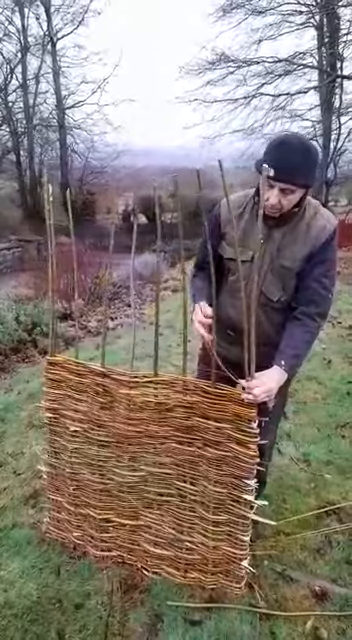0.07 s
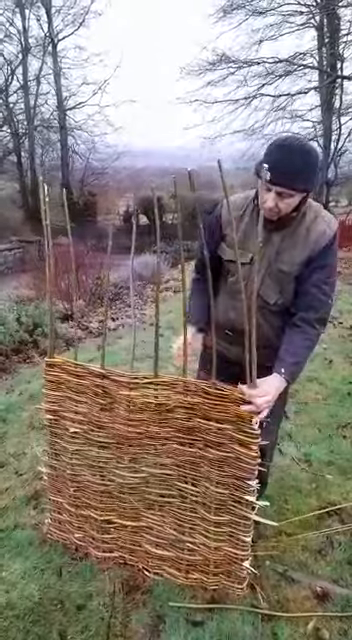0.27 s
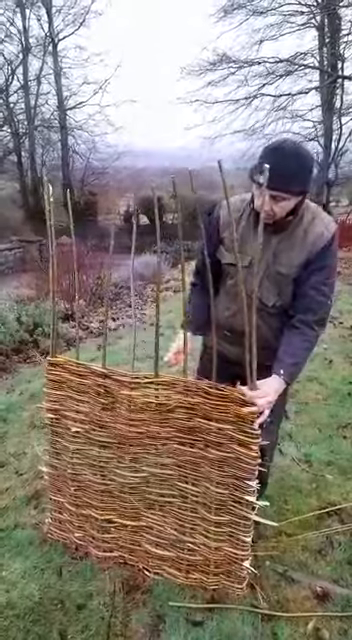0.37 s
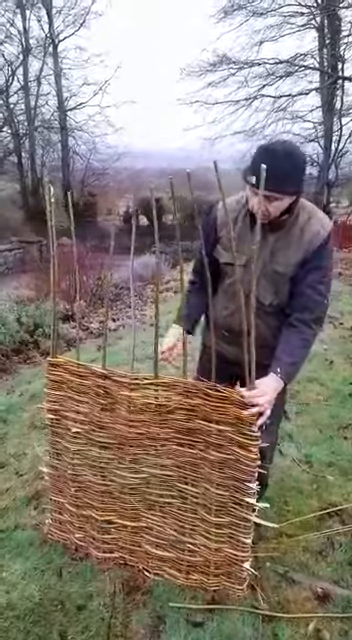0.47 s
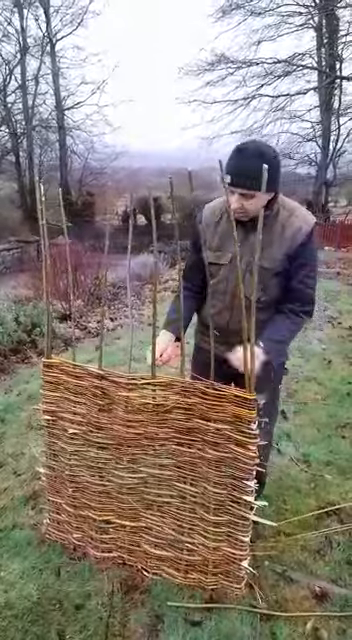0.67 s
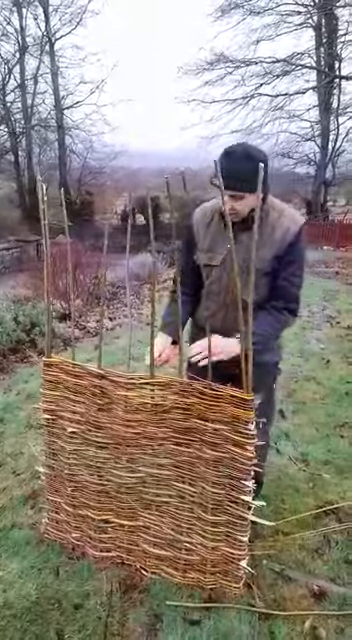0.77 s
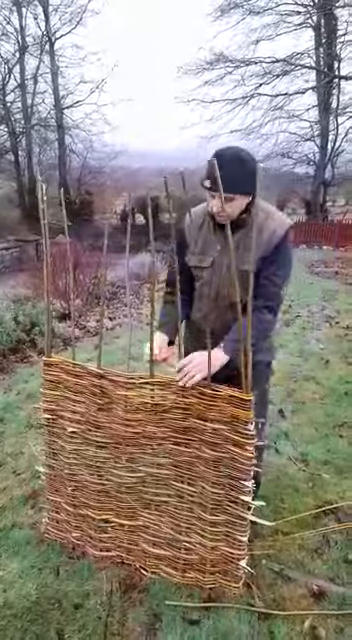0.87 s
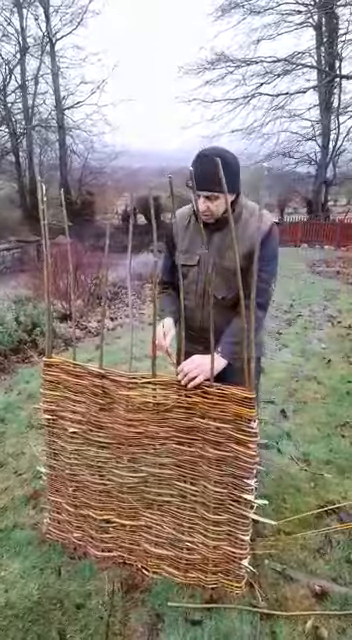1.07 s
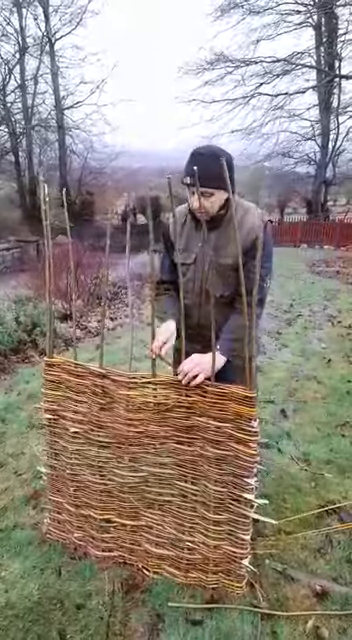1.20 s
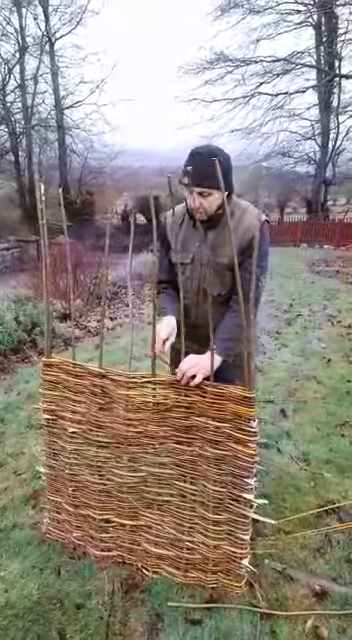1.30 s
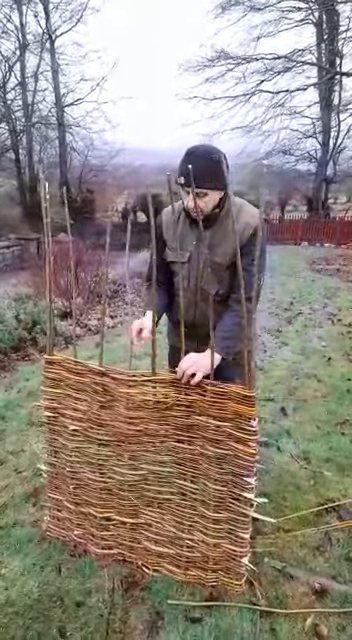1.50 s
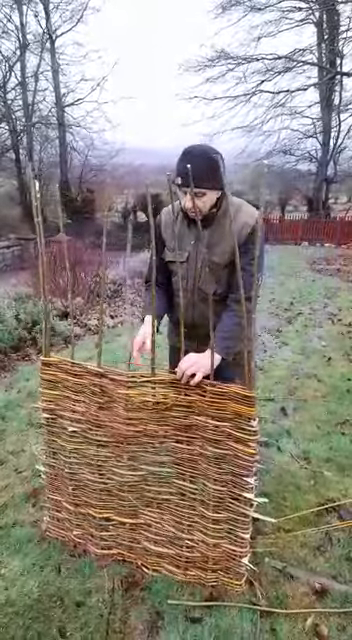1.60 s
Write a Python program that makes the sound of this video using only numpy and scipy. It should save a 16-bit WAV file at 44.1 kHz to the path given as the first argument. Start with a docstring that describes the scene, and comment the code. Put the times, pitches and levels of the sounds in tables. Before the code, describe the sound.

Willow rods are woven into a panel a few metres away in a quiet garden. Faint ticks and bark scrapes surround one sharp wooden knock, then soften to rustles. Light wind rumbles on the microphone, mostly on the right.

```python
"""Weaving willow in a garden.

Rods are worked into a panel a few metres away. One knocks on a stake and rings in damped wood modes.
Tips tick; bark slides, scrapes and squeaks in small slips; the panel flexes and sleeves rustle.
Behind are still air, a faint hiss and two notes of a far bird.
Light wind buffets the two microphone ports separately, mostly the right one."""
import sys
import numpy as np
from scipy import signal
from scipy.fft import rfft, irfft
from scipy.io import wavfile
from scipy.ndimage import uniform_filter1d

SR = 44100
rng = np.random.default_rng(int(sys.argv[2]) if len(sys.argv) > 2 else 0)


def generate_wav(sig):
    """Save sig (samples, or channels by samples) to the path in sys.argv[1] as 16-bit PCM at SR."""
    pcm = np.round(np.clip(np.atleast_2d(sig).T, -1, 1) * 32767).astype(np.int16)
    wavfile.write(sys.argv[1], SR, pcm)


N = 72765
TIME_S = np.arange(N) / SR
FREQ_HZ = np.fft.rfftfreq(N, 1 / SR)


def undb(db):
    """Decibels to gain."""
    return 10 ** (np.asarray(db) / 20)


def pan(left_minus_right_db):
    """Left and right gains."""
    return undb(np.array([[left_minus_right_db], [-left_minus_right_db]]) / 2)


def colour(x, spectrum):
    """Shape by (f/Hz, level/dB) points, 12 dB/octave roll-off below the first; rms 1."""
    hz, db = np.array(spectrum).T
    f = np.maximum(FREQ_HZ, 1)
    roll_off = np.minimum(f / hz[0], 1) ** 2
    gain = undb(np.interp(np.log(f), np.log(hz), db))
    y = irfft(rfft(x) * roll_off * gain, N)
    return y / np.sqrt(np.mean(y ** 2))


def ports(three_signals, crossover_hz=1450):
    """One shared and two separate signals to stereo: alike in the bass, different in the treble."""
    apart = FREQ_HZ / (FREQ_HZ + crossover_hz)
    spectra = rfft(three_signals)
    return irfft(np.sqrt(1 - apart) * spectra[0] + np.sqrt(apart) * spectra[1:], N)


def noise(spectrum):
    """Coloured noise at both ports."""
    return colour(ports(rng.standard_normal((3, N))), spectrum)


def swell(start, attack, hold, release):
    """Linear rise, hold, exponential release."""
    t = TIME_S - start
    rise = np.clip(t / max(attack, 1 / SR), 0, 1)
    return rise * np.exp(-np.maximum(t - attack - hold, 0) / release)


def strokes(rows):
    """Envelope of summed swells."""
    return sum(undb(db) * swell(start, attack, hold, release) for start, attack, hold, release, db in rows)


# Air spectrum: f/Hz, level/dB
AIR_SPECTRUM = [(30, 6), (70, -4), (150, -6), (300, -3.5), (500, -13), (800, -23), (1500, -25.5),
                (2500, -29.5), (3700, -30.5), (6700, -25), (8400, -30), (13000, -24), (16000, -23.5)]
# Hiss swell: t/s, attack/s, hold/s, release/s, level/dB
HISS_SWELL = [(.47, 0.075, 0.075, 0.36, -76.5)]
# Hiss spectrum: f/Hz, level/dB
HISS_SPECTRUM = [(1500, -18), (2100, -11), (2450, -8.5), (2850, -14.5), (3400, -24)]


def garden_air(floor_db=-70):
    """Still air and one faint swell of narrow hiss."""
    return undb(floor_db) * noise(AIR_SPECTRUM) + strokes(HISS_SWELL) * noise(HISS_SPECTRUM)


# Bird notes: t/s, length/s, top f/Hz, level/dB
BIRD_NOTES = [(0.955, .038, 2320, -79), (0.984, 0.13, 2520, -80.5)]


def far_bird(arch=0.185, top_at=0.35, waver_depth=0.016):
    """Thin wavering notes that arch and fall in pitch."""
    waver = colour(rng.standard_normal(N), [(30, 1), (100, 3), (400, -33)])
    out = 0
    for start, length, top_hz, db in BIRD_NOTES:
        along = np.clip((TIME_S - start) / length, 0, 1)
        hz = top_hz * (1 - arch * (along - top_at) ** 2 + waver_depth * waver)
        tone = np.sin(2 * np.pi * np.cumsum(hz) / SR)
        out += undb(db) * np.sin(np.pi * along) * tone
    return out


# Turbulence spectrum before levelling and tilt: f/Hz, level/dB
TURBULENCE_SPECTRUM = [(38, -23), (60, -0.5), (90, -10), (130, -20.5), (200, -33), (320, -24), (600, -52),
                       (2000, -87)]


def turbulence(breeze, levelling_s=0.033):
    """Rumble on one port, levelled, then scaled by the strength of the breeze."""
    raw = colour(rng.standard_normal(N), TURBULENCE_SPECTRUM)
    power = uniform_filter1d(np.abs(signal.hilbert(raw)) ** 2 / 2, int(levelling_s * SR))
    tilt = [(20, -7.5), (160, -4.0), (1000, -31.5)]
    times, db = np.array(breeze).T
    return colour(raw / np.sqrt(power), tilt) * undb(np.interp(TIME_S, times, db))


# Breeze on each port: t/s, level/dB
BREEZE_LEFT = [(0, -77), (.6, -69), (.83, -72), (.88, -47), (.99, -40), (1.04, -56), (1.16, -66),
               (1.45, -81), (1.49, -53.5), (1.56, -67.5)]
BREEZE_RIGHT = [(0, -52.5), (.16, -57.5), (.2, -63), (.25, -71), (.29, -49), (.35, -38.5), (.44, -48),
                (.5, -40), (.56, -32.5), (.65, -45), (.69, -53), (.76, -42.5), (.82, -72), (.9, -53),
                (1.04, -46.5), (1.17, -64), (1.28, -65.5), (1.325, -41.5), (1.42, -50), (1.49, -57),
                (1.55, -49), (1.6, -71)]
# Eddies: t/s, level/dB, f/Hz, port
EDDIES = [(0.328, -29, 53, "right"), (.463, -25.5, 78, "right"), (0.5272, -22, 156, "right"),
          (.544, -17, 71.5, "right"), (0.5636, -25, 110, "right"), (.592, -33.5, 74, "right"),
          (0.9096, -33.5, 84, "left"), (1.051, -25.5, 60.4, "right"), (1.328, -36, 83, "right"),
          (1.4399, -23.5, 58, "right")]


def wind(eddy_cycles=0.43):
    """Independent rumble on the two ports; single eddies thump one of them."""
    pressure = {"left": turbulence(BREEZE_LEFT), "right": turbulence(BREEZE_RIGHT)}
    for centre, db, hz, port in EDDIES:
        cycles = (TIME_S - centre) * hz
        envelope = 1 / np.cosh(np.clip(2 * cycles / eddy_cycles, -20, 20))
        pressure[port] += undb(db) * envelope * np.cos(2 * np.pi * cycles)
    return np.array([pressure["left"], pressure["right"]])


# Sleeve strokes: t/s, attack/s, hold/s, release/s, level/dB
SLEEVE_STROKES = [(.48, 0.071, 0.027, 0.17, -70), (.95, 0.032, 0.094, 0.19, -75),
                  (1.34, 0.092, 0.022, 0.027, -69.5)]
# Sleeve spectrum: f/Hz, level/dB
SLEEVE_SPECTRUM = [(300, 20), (700, 5.5), (1500, 0.5), (2500, -9), (4000, -17), (6500, 0), (8500, -10.5),
                   (14000, -3.5), (16000, -7.5)]


def sleeves():
    """Cloth rustles in soft swells of noise."""
    return strokes(SLEEVE_STROKES) * noise(SLEEVE_SPECTRUM)


def stick_slip(spectrum, slips_per_s=7000, scatter_db=2):
    """Friction as dense clicks of uneven size."""
    slips = rng.random(N) < slips_per_s / SR
    sizes = undb(scatter_db * np.minimum(rng.exponential(size=N), 2))
    return colour(ports(slips * sizes * rng.standard_normal((3, N))), spectrum)


def weave_resonances(x, spacing_hz=140, ripple_db=2.0):
    """The crowd of rods rings at many close, irregular frequencies."""
    knots_hz = np.arange(0, SR / 2, spacing_hz)
    gain = undb(ripple_db * np.interp(FREQ_HZ, knots_hz, rng.standard_normal(len(knots_hz))))
    return irfft(rfft(x) * gain / np.sqrt(np.mean(gain ** 2)), N)


# Friction strokes: t/s, attack/s, hold/s, release/s, level/dB
ROD_SLIDES = [(-.01, 0.0035, 0.0086, 0.098, -64), (.254, 0.0013, 0.062, 0.11, -66),
              (.886, 0.0076, 0.015, 0.05, -65), (1.39, 0.045, 0.015, 0.047, -76.5)]
BARK_SCRAPES = [(.144, 0.0094, 0.013, 0.018, -58.5), (.07, 0.0057, 0.0077, 0.025, -69.5),
                (.26, 0.0048, 0.063, 0.057, -64), (.71, 0.012, 0.0066, 0.024, -76),
                (1.14, 0.049, 0.032, 0.025, -71.5), (1.325, 0.029, 0.098, 0.02, -76.5)]
PANEL_FLEXES = [(.3, 0.014, 0.015, 0.045, -64), (.89, 0.021, 0.013, 0.066, -72.5),
                (1.1, 0.042, 0.1, 0.096, -81.5)]
# Slide, scrape and wood body spectra: f/Hz, level/dB
SLIDE_SPECTRUM = [(200, 2), (350, -1.5), (1000, -6.5), (1500, -4), (2500, -5.5), (4400, -7), (7000, -8),
                  (8600, -15.5), (12500, -5.5), (16000, -8)]
SCRAPE_SPECTRUM = [(300, 0.5), (1200, -7), (2200, -10.5), (3100, -1.5), (4400, -5.5), (5600, -0.5),
                   (7000, -2.5), (8500, -12.5), (16000, -9.5)]
WOOD_SPECTRUM = [(150, 10), (400, 7.5), (1400, 2.5), (2500, -12.5), (5000, -47)]


def rubbing():
    """Rods slide through the weave, bark scrapes bark, the bent panel gives a low woody rub."""
    slide = strokes(ROD_SLIDES) * stick_slip(SLIDE_SPECTRUM)
    scrape = strokes(BARK_SCRAPES) * stick_slip(SCRAPE_SPECTRUM)
    flex = strokes(PANEL_FLEXES) * stick_slip(WOOD_SPECTRUM)
    return weave_resonances(slide) + weave_resonances(scrape) + weave_resonances(flex)


# Squeaks: t/s, f/Hz, level/dB, half length/s
BARK_SQUEAKS = [(0.1695, 5600, -46.5, 0.001), (0.888, 7000, -56.5, 0.0018), (1.214, 2944, -76, 0.014)]


def bark_squeaks(roughness=0.045):
    """Damp bark catches for an instant and sings on one rough note."""
    waver = noise([(50, 7), (900, -6), (2500, -25)])
    out = 0
    for centre, hz, db, half_length in BARK_SQUEAKS:
        tone = np.sin(2 * np.pi * np.cumsum(hz * (1 + roughness * waver), axis=1) / SR)
        envelope = np.exp(-((TIME_S - centre) / half_length) ** 2)
        out += undb(db) * envelope * tone
    return out


# Ticks: t/s, snap level/dB, click level/dB, wood level/dB, attack/s, decay/s
TIP_TICKS = [(0.0304, -60, -55, -55.5, 0.0046, 0.0045), (0.0617, -50.5, -59, -68, 0.00056, 0.0056),
             (0.076, -69, -63.5, -70, 0.0046, 0.0077), (0.1668, -74, -57.5, -94, 0.002, .003),
             (0.256, -85, -63.5, -58.5, 0.0016, 0.0063), (0.327, -45.5, -59, -78, 0.0004, 0.0031),
             (0.3836, -71, -61, -65.5, 0.0008, 0.0097), (0.8836, -58, -60, -63.5, 0.00047, 0.0065)]
# Snap and click spectra: f/Hz, level/dB
SNAP_SPECTRUM = [(2000, -27), (6000, -15), (9000, -13.5), (14000, -7.5), (16000, -9)]
CLICK_SPECTRUM = [(1000, -20), (3000, 8), (4500, 2), (5700, 11), (7200, 6.5), (8500, -2.5), (16000, -20)]


def tip_ticks():
    """Thin tips flick past one another: a bright snap, a click and a little wood."""
    snap, click, wood = noise(SNAP_SPECTRUM), noise(CLICK_SPECTRUM), noise(WOOD_SPECTRUM)
    out = 0
    for start, snap_db, click_db, wood_db, attack, decay in TIP_TICKS:
        blend = undb(snap_db) * snap + undb(click_db) * click + undb(wood_db) * wood
        out += swell(start, attack, 0, decay) * blend
    return out


# Rod and stake modes: f/Hz, level/dB, t60/s
WOOD_MODES = [(484, -21, 0.0042), (673, -3.5, 0.017), (1090, -3.5, 0.0096), (1570, -5.5, 0.0052),
              (2520, -6.5, 0.015), (2720, -5.5, 0.012), (3620, -20, 0.023), (4140, -13.5, 0.018),
              (5400, -20, 0.023), (5880, -19, 0.014), (6385, -20, 0.012), (7100, -20, 0.018)]


def wood_ring(start, contact_s, right_lag_s=0.00014):
    """Damped modes of rod and stake after one hit, reaching the right port later."""
    t = np.maximum(TIME_S - start - np.array([[0], [right_lag_s]]), 0)
    modes = sum(undb(db) * np.sin(2 * np.pi * hz * t) * np.exp(-np.log(1000) * t / t60)
                for hz, db, t60 in WOOD_MODES)
    return -modes * (1 - np.exp(-t / contact_s))


# Hit and rebound: t/s, level/dB
STAKE_HITS = [(0.2044, -29.5), (.2295, -52.5)]
# Crack and panel shiver spectra: f/Hz, level/dB
CRACK_SPECTRUM = [(500, 25.5), (7000, -4), (10000, -1), (15000, 1)]
SHIVER_SPECTRUM = [(100, -11.5), (300, 7.5), (700, -6), (1500, -12), (3000, -13), (7000, -22.5),
                   (16000, -15)]


def stake_knock(contact_s=0.00008, crack_db=-41, shiver_db=-54.5, low_cut_hz=237):
    """A rod hits a stake and rebounds: ringing wood, a crack and a shiver of the weave."""
    wood = sum(undb(db) * wood_ring(start, contact_s) for start, db in STAKE_HITS)
    first_s = STAKE_HITS[0][0]
    crack = undb(crack_db) * swell(first_s, contact_s, hold=0, release=0.0029) * noise(CRACK_SPECTRUM)
    shiver = undb(shiver_db) * swell(first_s, 0.00056, hold=0, release=0.027) * noise(SHIVER_SPECTRUM)
    # Little bass below about 240 Hz in the knock.
    bass_cut = signal.butter(2, low_cut_hz, "high", fs=SR, output="sos")
    return signal.sosfilt(bass_cut, wood + crack + shiver)


def scene():
    """Weaving and garden, both right of centre, plus wind on the ports."""
    knock = stake_knock() * pan(-1.5)
    handling = (tip_ticks() + bark_squeaks() + rubbing() + sleeves()) * pan(-4)
    garden = (far_bird() + garden_air()) * pan(-3)
    return knock + handling + garden + wind()


def record(dry, low_cut_hz=35, high_cut_hz=16000):
    """Cut the deepest bass and the top."""
    high_pass = signal.butter(3, low_cut_hz, "high", fs=SR, output="sos")
    low_pass = signal.ellip(8, 0.2, 70, high_cut_hz, fs=SR, output="sos")
    return signal.sosfilt(low_pass, signal.sosfiltfilt(high_pass, dry))


dry = scene()
out = record(dry)
generate_wav(out)
```